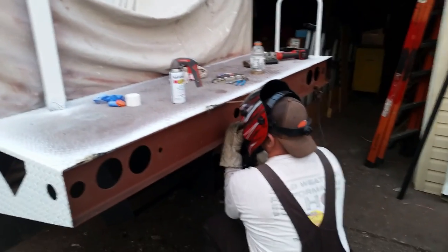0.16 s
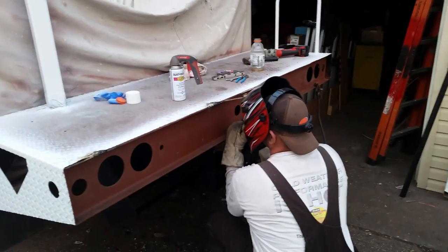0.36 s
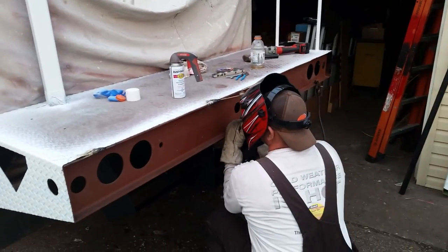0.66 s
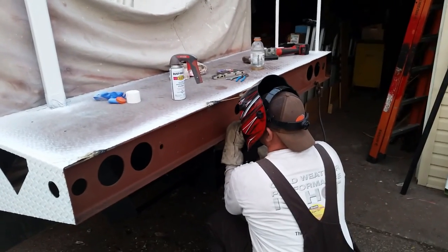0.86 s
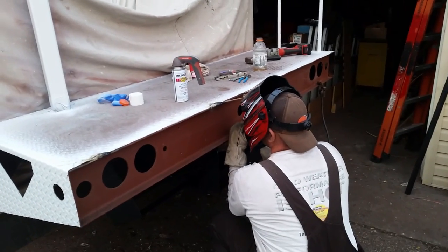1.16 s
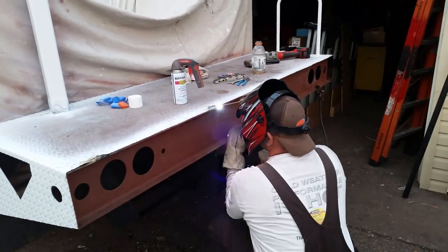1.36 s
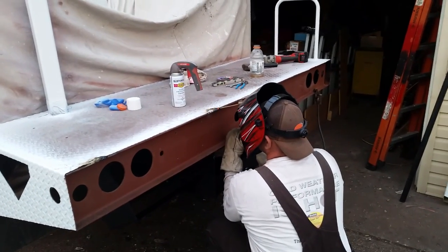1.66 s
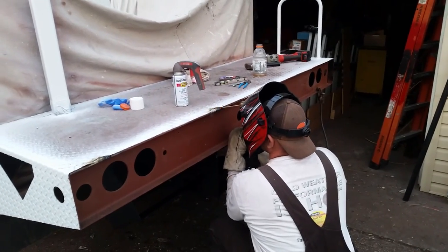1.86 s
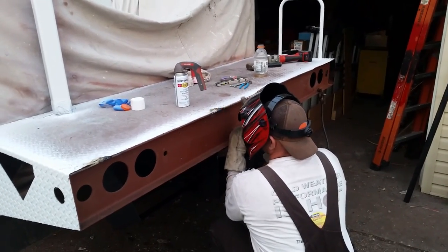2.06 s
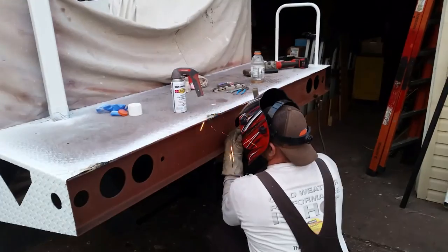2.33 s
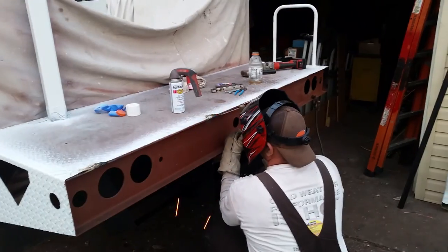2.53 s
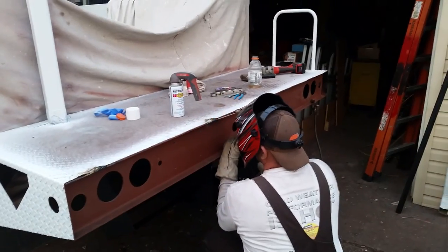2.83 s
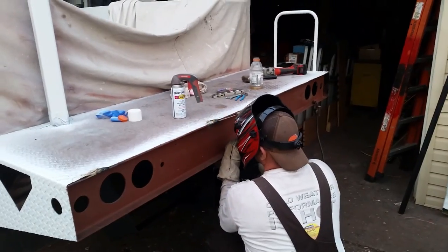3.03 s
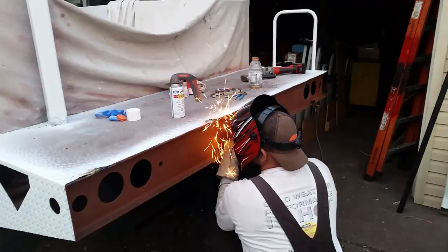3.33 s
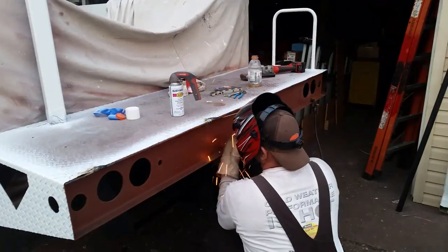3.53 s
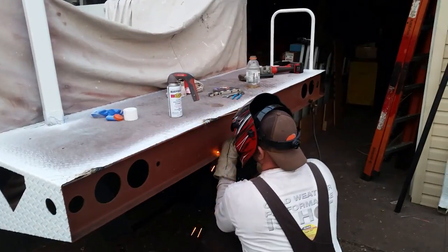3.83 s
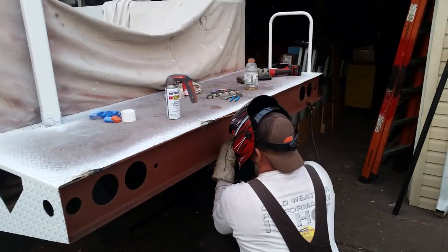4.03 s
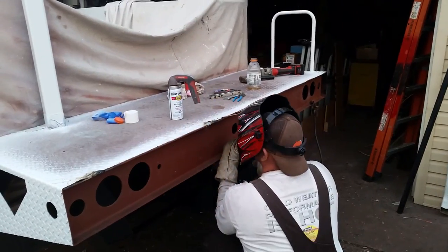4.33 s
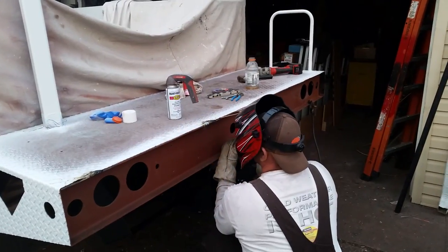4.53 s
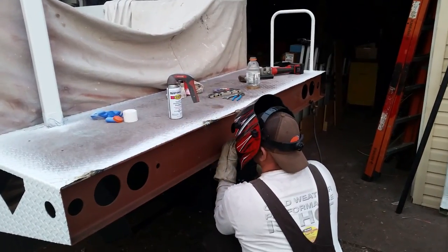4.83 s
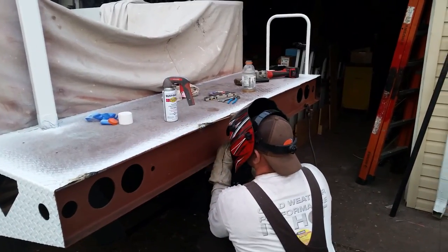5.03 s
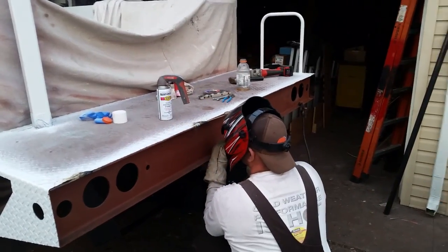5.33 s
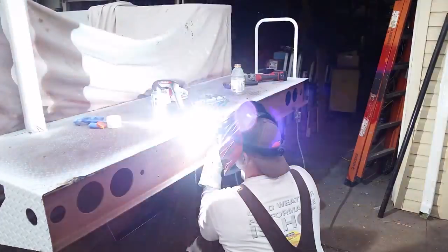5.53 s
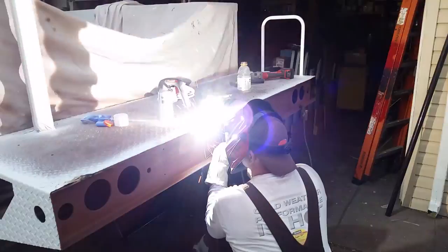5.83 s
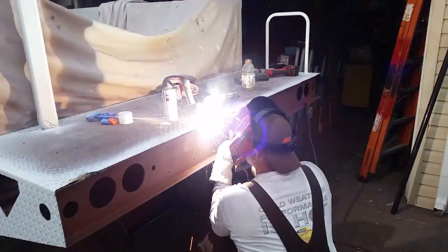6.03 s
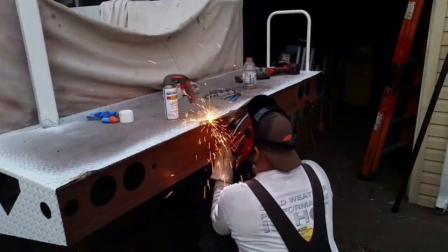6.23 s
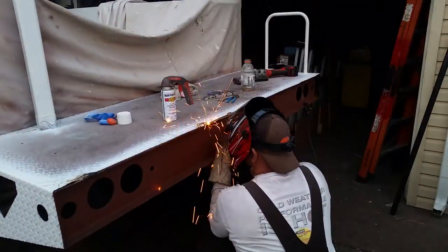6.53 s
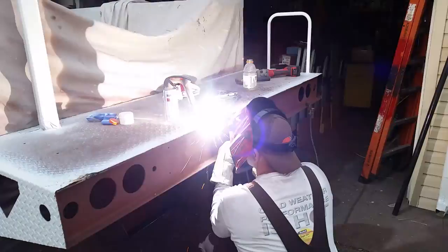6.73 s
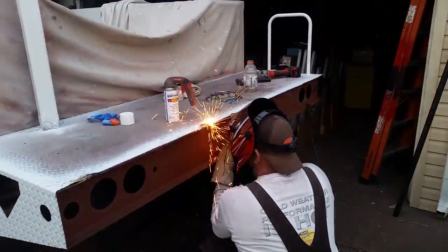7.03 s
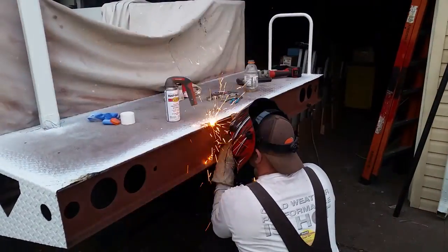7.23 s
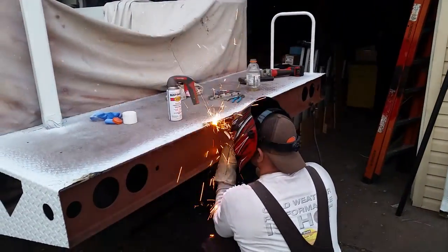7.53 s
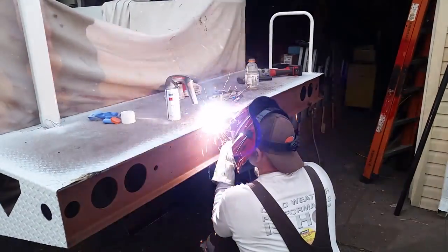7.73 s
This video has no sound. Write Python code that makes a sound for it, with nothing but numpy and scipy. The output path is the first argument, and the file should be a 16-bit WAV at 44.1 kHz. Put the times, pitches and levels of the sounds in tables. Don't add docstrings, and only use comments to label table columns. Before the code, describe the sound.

Rapid uneven exhaust thumps with harsh, overloaded hiss puffs and steady mechanical rattle, straining harder under welding load, recorded close outdoors beside a garage.

```python
import sys
import numpy as np
from scipy import signal
from scipy.io import wavfile
from scipy.ndimage import uniform_filter1d

SR = 44100
rng = np.random.default_rng(int(sys.argv[2]) if len(sys.argv) > 2 else 0)


def put_to_file(sound):
    columns = np.atleast_2d(sound).T
    safe = np.clip(columns, -1, 1)
    whole_steps = np.round(safe * 32767)
    wavfile.write(sys.argv[1], SR, whole_steps.astype(np.int16))


def decibels_to_gain(level_db):
    exponent = np.asarray(level_db, float) / 20
    return 10 ** exponent


N = 347508
TIME = np.arange(N) / SR

# t/s, speed [cycles/s], exhaust effort [0-1]
GOVERNOR = [(0.0, 26.169, 0.0), (1.04, 26.017, 0.17), (1.39, 26.125, 0.35), (1.88, 25.401, 0.6),
            (2.27, 25.36, 0.9), (2.64, 26.289, 0.71), (2.93, 26.541, 0.3), (3.34, 25.599, 0.37),
            (3.61, 25.694, 0.56), (4.05, 26.301, 0.49), (4.4, 26.378, 0.24), (4.95, 26.047, 0.2),
            (5.53, 25.995, 0.39), (5.92, 25.002, 0.75), (6.4, 25.19, 1.0), (6.74, 25.831, 0.94),
            (7.16, 26.049, 0.62), (7.88, 25.764, 0.57)]
# multiple of cycle rate [1], idle left level/dB, idle right level/dB, full-throttle change/dB
LOW_ORDERS = [(1, -66, -65, 4), (2, -48, -48, 3), (3, -62, -61, 4), (4, -43, -43, 7), (5, -48, -49, 3),
              (6, -34, -32, 0), (7, -53, -51, 4), (8, -47, -43, 7), (9, -44, -44, -6), (10, -33, -31, -2),
              (11, -39, -38, -3), (12, -42, -41, -1), (13, -40, -39, 0), (14, -50, -50, 6),
              (15, -49, -48, -1), (16, -39, -39, 3), (17, -46, -48, 5), (18, -43, -44, -3),
              (19, -47, -43, -3), (20, -46, -47, -3), (21, -52, -52, -1), (22, -50, -50, 2),
              (23, -41, -43, 0), (24, -47, -45, -5), (25, -35, -37, -1), (26, -54, -49, -2),
              (27, -43, -43, -5), (28, -42, -42, 1), (29, -38, -45, -4), (30, -44, -46, -5)]
# multiple [1], left level/dB, right level/dB
LIFTED_ORDERS = [(31, -45, -41), (32, -48, -47), (33, -43, -39), (34, -49, -44), (35, -43, -39),
                 (37, -43, -44), (39, -46, -49), (43, -46, -44), (49, -47, -47), (51, -48, -48),
                 (52, -43, -51), (54, -43, -48), (55, -45, -49), (58, -47, -50), (64, -43, -55)]
# start t/s, length t/s, level/dB
ARCS = [
    (1.502, 0.83, -34),
    (3.25, .18, -37),
    (5.55, .45, -37),
    (6.35, 0.57, -32.5),
    (6.85, 1.2, -34.5),
]
# f/Hz, cylinder 1 left level/dB, right level/dB, cylinder 2 left level/dB, right level/dB
JET_COLOUR = [(2480, -64.5, -73.5, -61, -71.5), (3800, -71, -64.5, -80, -60),
              (4760, -68, -70.5, -62.5, -65.5), (6730, -85, -64, -103, -59), (7560, -81, -74, -68, -77),
              (8520, -68.5, -87, -69, -71), (9594, -56, -100, -48, -85), (10110, -43, -75, -46, -72),
              (11550, -51.5, -74, -44, -64.5), (12200, -49.5, -73, -50, -69),
              (13400, -55.5, -73, -52.5, -72), (15130, -49, -82, -52, -75), (16100, -51.5, -78, -54, -74)]
# peak, rise, fall [shares of cycle], idle level/dB, loaded level/dB
PUFFS = [
    (.07, 0.057, 0.19, -0.76, 0.88),
    (.27, 0.05, 0.079, -2.5, -12.5),
    (.55, 0.054, 0.048, 0.5, -.3),
    (.62, 0.044, 0.061, -16, -1),
    (.71, 0.11, 0.061, -3.5, -6),
    (.84, 0.061, .2, -12, -13.5),
]
# t/s, extra level/dB
HARD_FIRINGS = [(.8, 1), (1.59, 1), (2.256, 0.5), (2.375, 1), (2.413, 1.5), (2.451, 1.5), (2.57, 1.5),
                (3.369, 2), (3.525, 3.5), (3.68, 2.5), (4.026, 2.5), (4.79, 2), (5.48, 2), (5.64, 2),
                (5.828, 1.5), (6.265, 1.5), (6.82, 2.5), (7.047, 2), (7.125, 3)]
# f/Hz, left level/dB per Hz, right level/dB per Hz
FLOOR_COLOUR = [(50, -98, -115), (139, -69, -62.5), (410, -65, -66.5), (480, -54, -54), (570, -67, -65.5),
                (1090, -61.5, -61.5), (1730, -65, -71.5), (2410, -66, -68.5), (3040, -80, -75.5),
                (3980, -66.5, -71.5), (5070, -80, -82), (6630, -85, -74), (7740, -91, -97),
                (9050, -66, -88)]
# f/Hz, likeness [0-1]
LIKENESS = [(60, 0.32), (250, 0.92), (480, 1), (900, 0.72), (2500, 0.39), (6000, 0.12), (10000, 0.39),
            (15000, 0.5)]


def evened(x):
    return x / np.sqrt(np.mean(x ** 2) + 1e-20)


def read(points, hz, axis=1):
    table = np.array(points, float)
    return np.interp(np.log(hz + 1), np.log(table[:, 0] + 1), table[:, axis])


def control(table, axis=1):
    table = np.array(table, float)
    return np.interp(TIME, table[:, 0], table[:, axis])


def drift(rate_hz):
    return np.interp(TIME * rate_hz, np.arange(3000), rng.standard_normal(3000))


def noise(colour_db, size, patchy_db, span_hz, span_s):
    hop = size // 4
    hz = np.fft.rfftfreq(size, 1 / SR)
    a, b, c, d, patches = rng.standard_normal((N // hop + 5, len(hz), 5)).T
    patches = uniform_filter1d(patches, max(round(span_hz * size / SR), 1), axis=0)
    patches = evened(uniform_filter1d(patches, max(round(span_s * SR / hop), 1), axis=1))
    same = np.clip(read(LIKENESS, hz), 0, 1)[:, None]
    late = np.exp(-2j * np.pi * hz * 17.5 / SR)[:, None]
    right = a + 1j * b
    left = late * same * right + np.sqrt(1 - same ** 2) * (c + 1j * d)
    z = np.array([left, right]) * decibels_to_gain(colour_db(hz)[:, :, None] + patchy_db * patches)
    return signal.istft(z, nperseg=size, noverlap=size - hop)[1][:, :N] * np.sqrt(SR / size)


def orders():
    top_multiple, base_db, slope_db, change_db = 66, [-53.5, -51], [-0.0693, -0.2013], -5.5
    low = list(LOW_ORDERS)
    lifted = {k: pair for k, *pair in LIFTED_ORDERS}
    upper = []
    for k in range(len(low) + 1, top_multiple + 1):
        sloped_db = np.add(base_db, np.multiply(slope_db, k - len(low)))
        upper.append((k, *lifted.get(k, sloped_db), change_db))
    return low + upper


def windings():
    idle_db, edge_s = -42, .08
    level_db = np.full(N, float(idle_db))
    for start_s, length_s, db in ARCS:
        level_db[(TIME >= start_s) & (TIME < start_s + length_s)] = db
    return uniform_filter1d(level_db, max(round(edge_s * SR), 1))


def exhaust(cycle, throttle):
    wall_turn_rad, wall_every, wall_from, wall_to = 1.5, 4, 27.3, 36.5
    out = np.zeros((2, N))
    scatter = rng.standard_normal((70, 2)) * [.4, .004]
    scatter[:, 0] *= 1 + 3 * np.exp(-((np.arange(70) - 17) / 9) ** 2)
    angle = 2 * np.pi * (cycle - .205 + .015 * throttle)
    late = 2 * np.pi * 10.5 / SR * 25.9
    for k, left_db, right_db, change_db in orders():
        swing = np.sqrt(2) * decibels_to_gain(-0.37 + throttle * change_db + (1.04 + 0.012 * k) * drift(7))
        if k == 8:
            swing = swing * decibels_to_gain(windings() - right_db - throttle * change_db)
        phase_scatter, delay_scatter = scatter[int(k)]
        pair = np.angle(1 + .95 * np.exp(-2j * np.pi * .52 * k))
        opposed = np.pi * (k in (4, 8))
        turn = k * angle + 2.1 + .4 * throttle + pair + opposed + phase_scatter + .15 * drift(5)
        wall = wall_turn_rad * np.sin(2 * np.pi * (k - wall_from) / wall_every) * (wall_from < k < wall_to)
        out[0] += decibels_to_gain(left_db) * swing * np.cos(turn + wall - .08 - k * (late + delay_scatter))
        out[1] += decibels_to_gain(right_db) * swing * np.cos(turn)
    return out


def pops(cycle):
    edges = np.zeros(N)
    for share, db in [(.21, 0.42), (.735, 7)]:
        at = np.flatnonzero(np.diff(np.floor(cycle - share)))
        jitter = rng.standard_normal((300, 2))[:len(at)]
        at = np.clip(at + (4.5 * jitter[:, 0]).astype(int), 0, N - 1)
        edges[at] -= decibels_to_gain(db + 1.6 * jitter[:, 1])
    t = np.arange(500) / SR

    def ring(hz, db):
        return signal.oaconvolve(edges, decibels_to_gain(db - 60 * t / 0.0048) * np.sin(2 * np.pi * hz * t))[:N]

    return np.array([np.roll(ring(2320, -28.0), 16), ring(2110, -35.0)])


def each_firing(cycle, spread_db):
    firing = np.floor(2 * cycle).astype(int)
    return spread_db * rng.standard_normal(500)[firing - firing.min()]


def hard_firings():
    decay_s = 0.01
    return sum(db * (TIME > s - .002) * np.exp(-((TIME - s) / decay_s) ** 2) for s, db in HARD_FIRINGS)


def gate(share, mix):
    leak_db, advance = -13.5, 0.014
    power = decibels_to_gain(2 * leak_db)
    for peak, rise, fall, idle_db, loaded_db in PUFFS:
        away = share - peak + advance * mix
        away = away / np.where(away < 0, rise, fall)
        power = power + decibels_to_gain(2 * (idle_db + mix * (loaded_db - idle_db))) * np.exp(-2 * away ** 2)
    return 10 * np.log10(power)


def garage(x):
    t = np.arange(8000) / SR
    tail = signal.lfilter([1, -.6], [1], rng.standard_normal((2, len(t)))) * decibels_to_gain(-60 * t / 0.047)
    return signal.oaconvolve(x, tail / np.linalg.norm(tail[0]), axes=1)[:, :N]


def jet(cycle, load, effort):
    share = (cycle - .39 + .003 * drift(40)) % 1
    first = share < .49
    mix = np.clip(5.7 * load - .4, 0, 1)
    gate_db = gate(share, mix) * np.array([[1.1], [.7]])
    strength_db = each_firing(cycle - .39, .3) + 1.2 * drift(250) + hard_firings()

    def cylinder_hiss(column):
        def colour_db(hz):
            sides = [read(JET_COLOUR, hz, axis=column), read(JET_COLOUR, hz, axis=column + 1)]
            return np.array(sides) - 40 * (hz < 2000)
        hiss = noise(colour_db, size=128, patchy_db=1.5, span_hz=900, span_s=.006)
        return hiss / np.std(hiss[0])

    hiss = np.where(first, cylinder_hiss(1), cylinder_hiss(3))
    level_db = np.where(first, -11 + 7.5 * effort, -12.5 + 5.5 * effort)
    since = np.where(first, share, share - .49)
    blow = np.clip(since / .035, 0, 1) * np.exp(-(since / .135) ** 2)
    blow_db = np.array([[1.8], [9.5]]) * load * blow + np.array([[0], [-2.5]])
    facing_db, turn_s, turn_length_s = 3.5, 0.83, 0.51
    facing = np.clip((turn_s - TIME) / turn_length_s + .5, 0, 1)
    blow_db = blow_db + np.array([[0], [facing_db]]) * facing
    direct = hiss * decibels_to_gain(level_db + gate_db + strength_db + blow_db)
    return direct + decibels_to_gain([[-13], [-8]]) * garage(direct)


def rattle_and_fan(cycle, load):
    def colour_db(hz):
        return np.array([read(FLOOR_COLOUR, hz), read(FLOOR_COLOUR, hz, axis=2)]) - 60 * (hz > 9500)

    wash = noise(colour_db, size=1024, patchy_db=1.0, span_hz=300, span_s=.08)
    return wash * decibels_to_gain(-1.5 + 0.31 * load + 2.54 * np.cos(4 * np.pi * (cycle - .3)))


def scene():
    speed_hz, effort = control(GOVERNOR), control(GOVERNOR, axis=2)
    cycle = 0.0045 + np.cumsum(speed_hz) / SR
    sag_hz = 26.15 - speed_hz
    throttle = np.clip(-0.13 + 0.49 * sag_hz + 0.78 * effort, 0, 1)
    load = np.clip((effort - 0.48) / 0.87, 0, 1)
    return exhaust(cycle, throttle) + pops(cycle) + jet(cycle, load, effort) + rattle_and_fan(cycle, load)


def low_pass(x):
    return signal.sosfilt(signal.butter(12, 16850, fs=SR, output="sos"), x)


def record(dry):
    spill_wide, spill_low, edge_hz = 0.096, 0.35, 15790
    highpass = signal.butter(3, 350, "high", fs=SR)
    lopsided = signal.lfilter(*highpass, np.clip(dry, -1.1, 1.1) ** 4)
    bent = dry + spill_wide * lopsided + spill_low * uniform_filter1d(lopsided, size=11)
    lowpass = signal.firwin(511, edge_hz, window=("kaiser", 9), fs=SR)[None]
    kept = signal.oaconvolve(np.clip(bent, -1.05, 1.05), lowpass, "same")
    return low_pass(np.clip(kept, -1, 1))


dry = scene()
out = record(dry)
put_to_file(out)
```